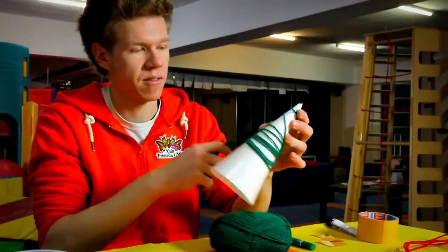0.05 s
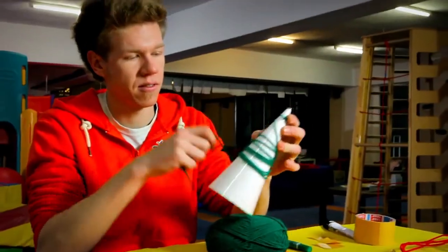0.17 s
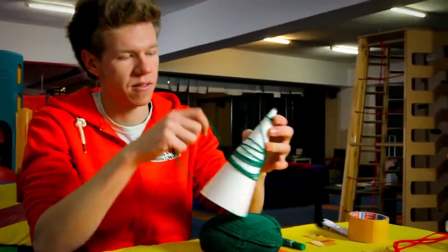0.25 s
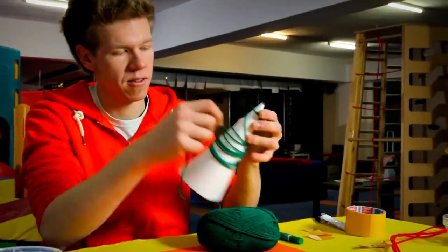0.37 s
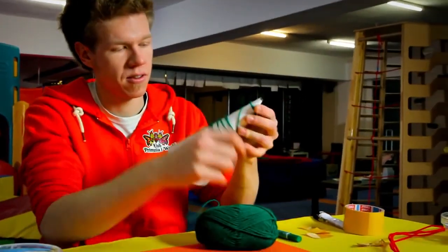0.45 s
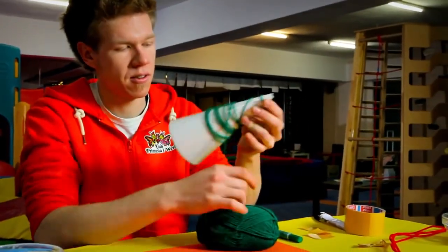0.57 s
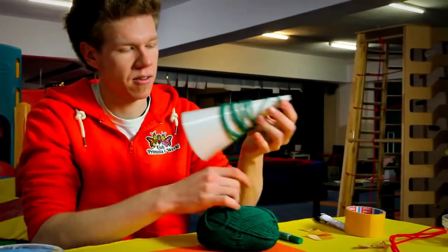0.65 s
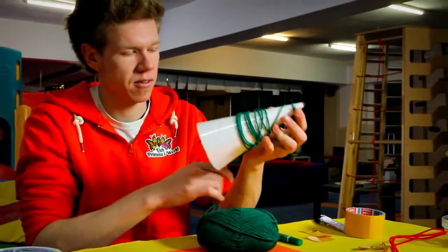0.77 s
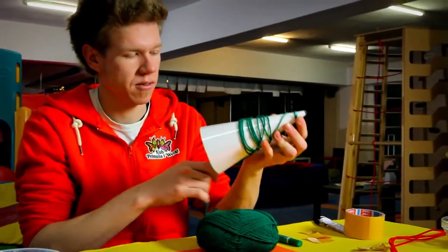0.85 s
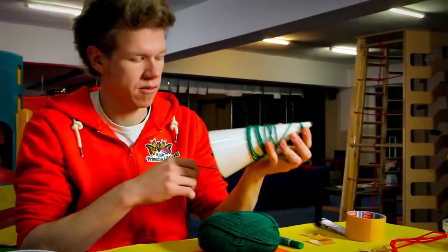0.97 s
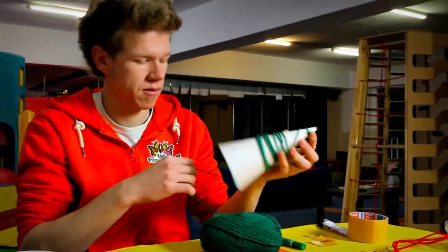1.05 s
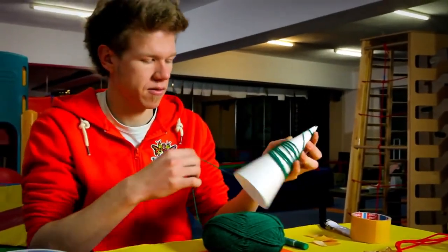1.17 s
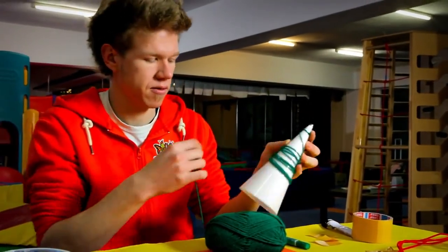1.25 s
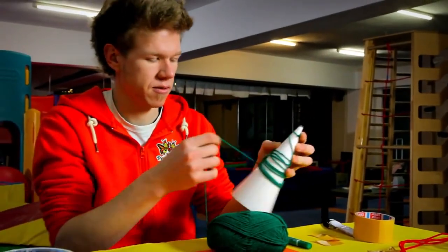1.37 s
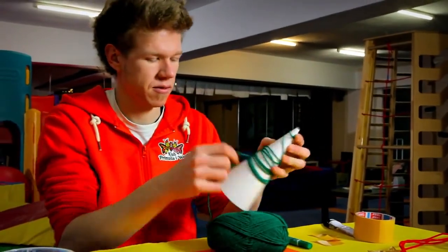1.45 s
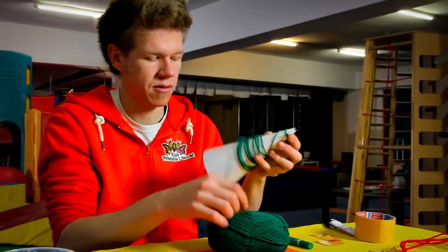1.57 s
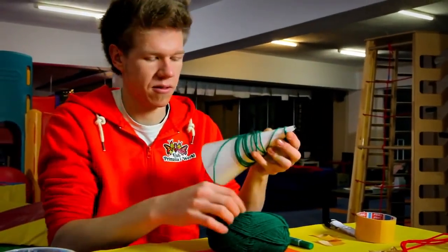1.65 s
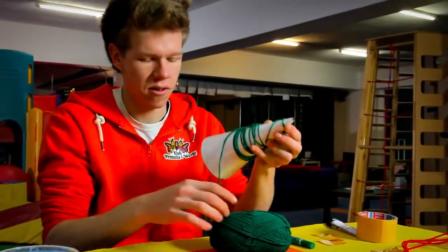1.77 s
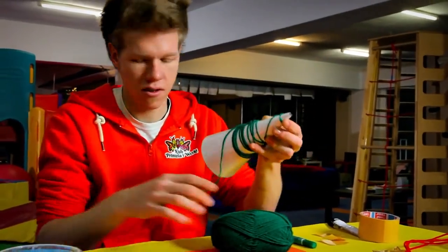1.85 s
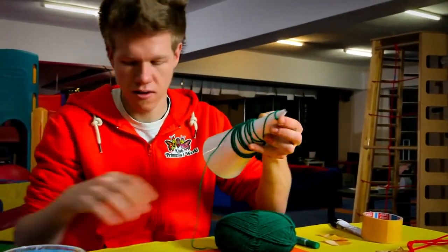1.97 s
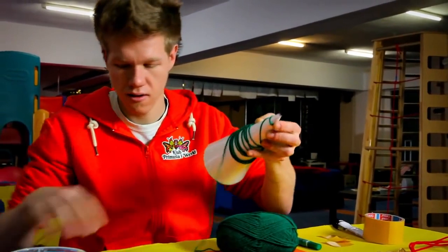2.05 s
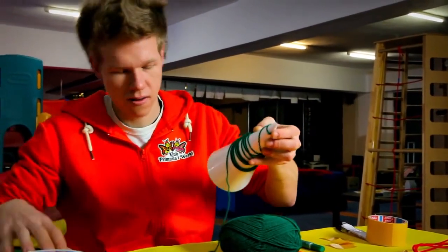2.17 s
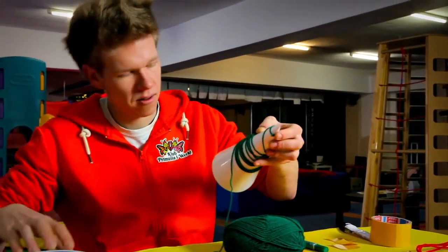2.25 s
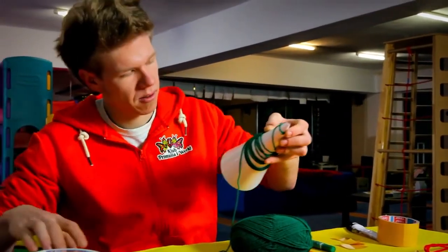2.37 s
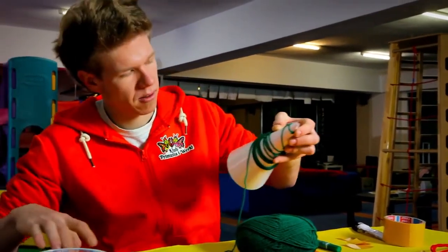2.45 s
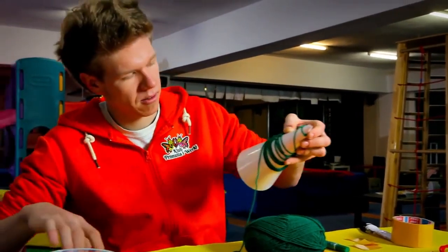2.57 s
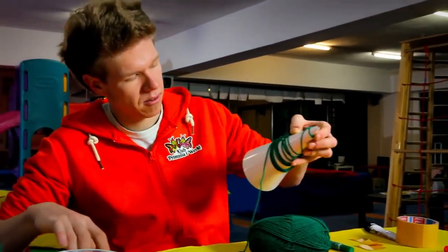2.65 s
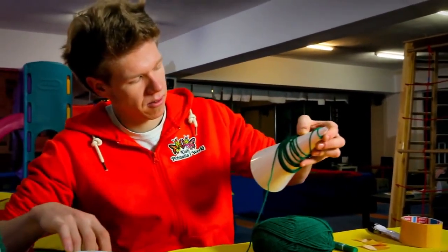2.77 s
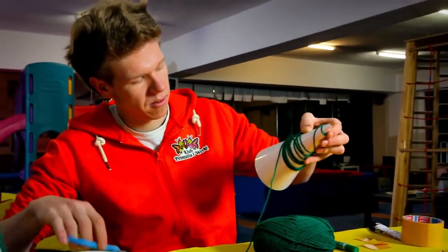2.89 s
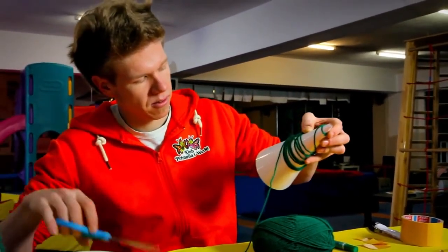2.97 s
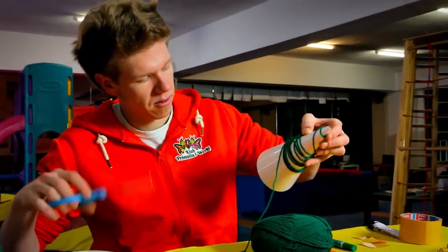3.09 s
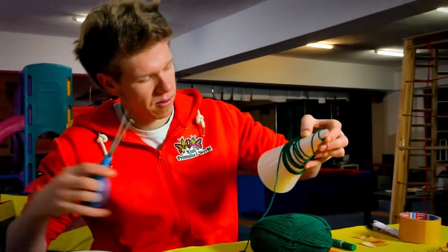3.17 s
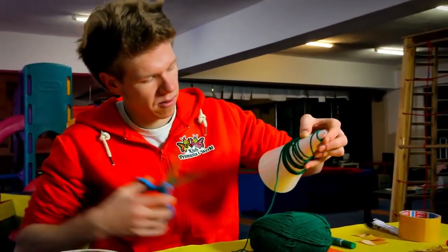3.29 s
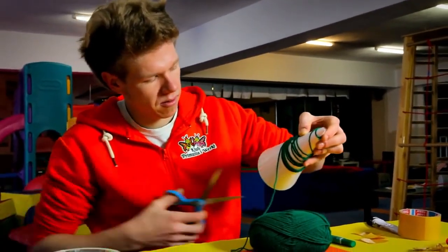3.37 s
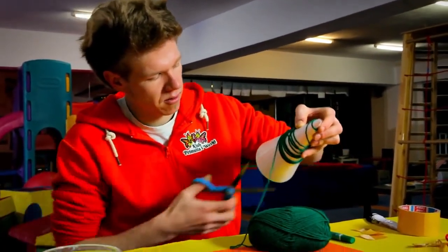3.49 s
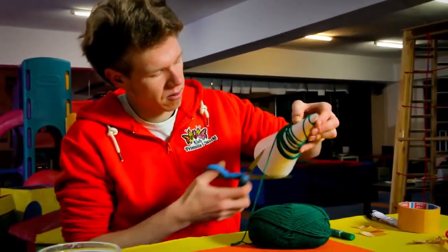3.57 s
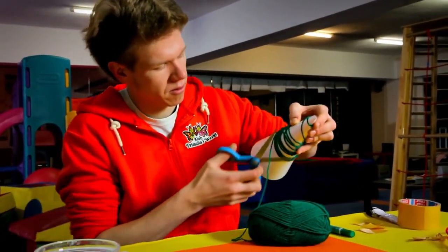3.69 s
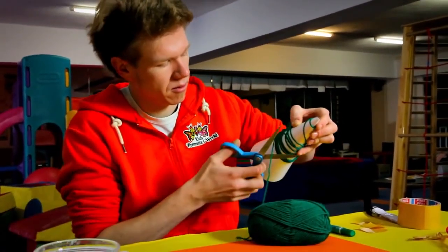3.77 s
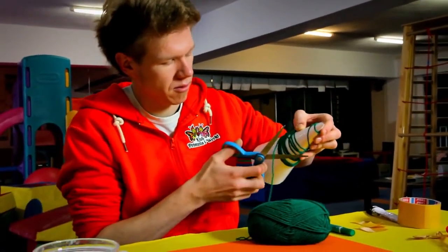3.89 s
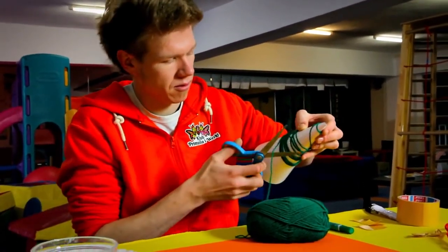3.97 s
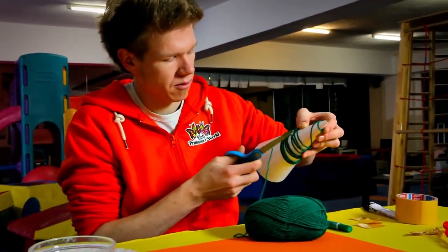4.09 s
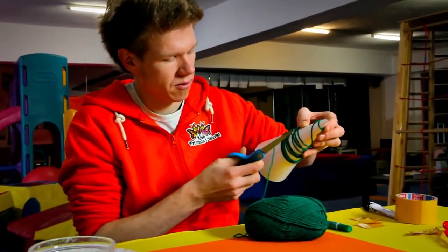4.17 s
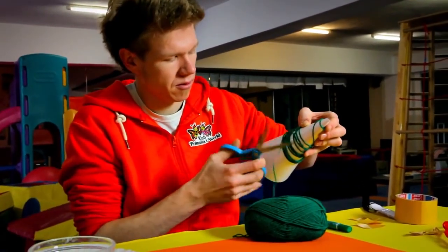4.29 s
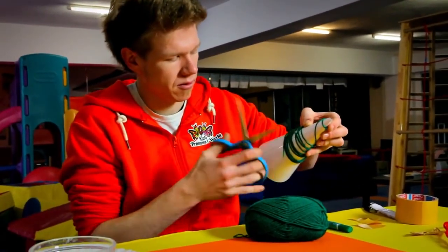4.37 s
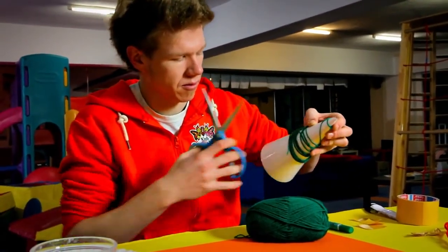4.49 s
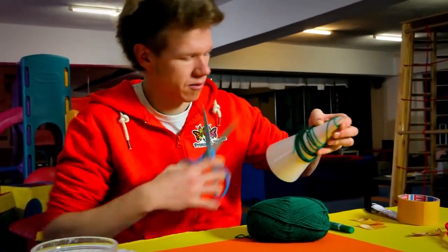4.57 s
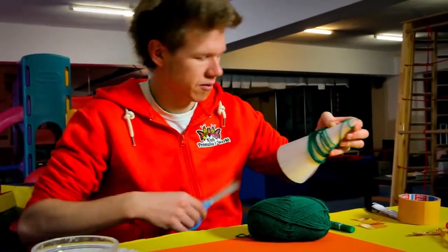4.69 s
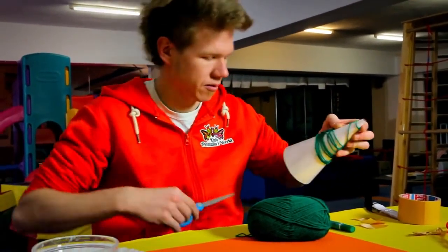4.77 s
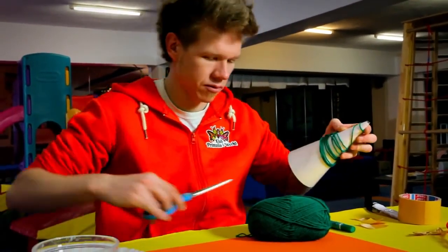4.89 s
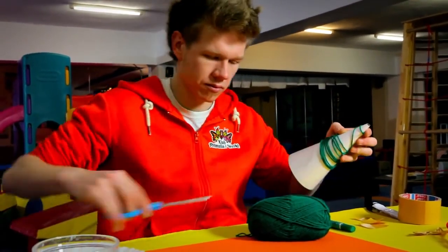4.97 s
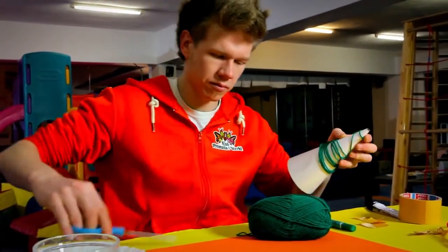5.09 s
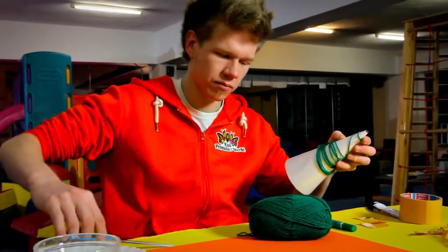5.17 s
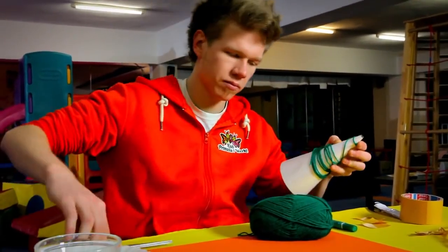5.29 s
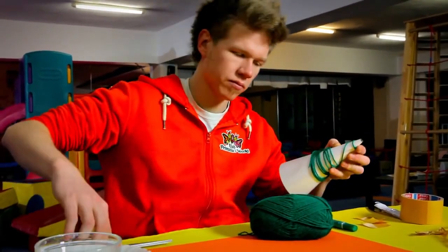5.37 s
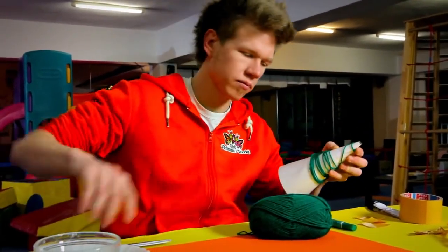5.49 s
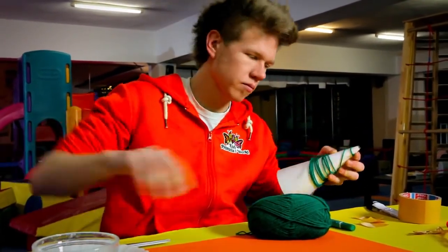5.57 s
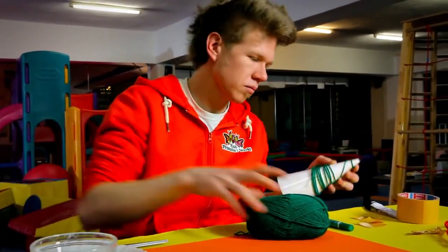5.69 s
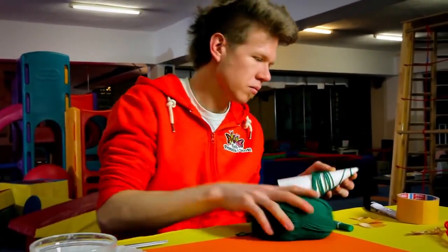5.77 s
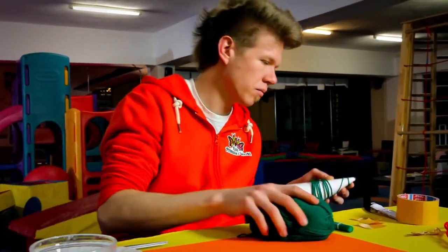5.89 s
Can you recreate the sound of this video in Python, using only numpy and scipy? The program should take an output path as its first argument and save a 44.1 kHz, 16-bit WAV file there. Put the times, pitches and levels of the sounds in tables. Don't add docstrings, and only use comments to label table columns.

```python
import sys
import numpy as np
from scipy import signal
from scipy.fft import rfft, irfft
from scipy.io import wavfile
from scipy.ndimage import uniform_filter1d

SR = 44100
rng = np.random.default_rng(int(sys.argv[2]) if len(sys.argv) > 2 else 0)


def linear_from_db(decibels):
    return 10 ** (np.asarray(decibels, float) / 20)


def transcribe(u):
    v = np.clip(np.atleast_2d(u).T, -1, 1)
    q = np.round(v * 32767).astype(np.int16)
    wavfile.write(sys.argv[1], SR, q)


N = 261865


def evened(x):
    return x / np.sqrt(np.mean(x ** 2) + 1e-20)


def read(points, hz):
    f, value = np.transpose(points)
    return np.interp(np.log(hz + 1), np.log(f + 1), value)


def add(mix, s, sound):
    part = mix[round(s * SR):][:len(sound)]
    part += sound[:len(part)]


def coloured(x, db_of_hz):
    gain = linear_from_db(db_of_hz(np.fft.rfftfreq(len(x), 1 / SR)))
    return evened(irfft(rfft(x) * gain, len(x)))


def causal(db_of_hz):
    log_gain = np.log(linear_from_db(db_of_hz(abs(np.fft.fftfreq(4096, 1 / SR)))))
    return np.fft.ifft(np.exp(np.conj(signal.hilbert(log_gain)))).real[:2048]


def strikes(rows, modes, centre_hz, favour_db, chatter_s, neutral_db):
    # frequency in Hz, level in dB.
    crack_spectrum = [(200, -15), (1200, 10.5), (2500, 9.5), (5000, -2.5), (7200, -11), (10000, -7.5),
                      (14000, -34)]
    out, t = np.zeros(N), np.arange(SR // 2) / SR
    hz, mode_db, t60 = np.transpose(modes)[:, :, None]
    sign = (-1.) ** np.arange(len(modes))[:, None]
    for s, db, ring, crack_db, best_hz in rows:
        hardness_db = 0.0892 * (db - neutral_db)

        def tilt(f):
            place_db = favour_db * np.exp(-(np.log2((f + 1) / best_hz) / 0.25) ** 2)
            return hardness_db * np.log2((f + 1) / centre_hz) + place_db

        decay = linear_from_db(mode_db + tilt(hz) - 60 * t / (t60 * ring))
        rings = decay * np.sin(2 * np.pi * hz * t) * sign
        chatter = 0.35 * rng.standard_normal(1024) * linear_from_db(-60 * t[:1024] / chatter_s)
        contact = signal.unit_impulse(1024) + chatter
        crack = np.convolve(contact, causal(lambda f: read(crack_spectrum, f) + tilt(f))[:512])
        add(out, s, linear_from_db(db) * rings.sum(0))
        add(out, s, linear_from_db(db + crack_db + 8) * crack)
    return out


def snips():
    # start in seconds, level in dB, gap between rebounds in seconds, most excited Hz.
    closings = [
        (4.136, -49, 0.013, 2900),
        (4.2744, -55, 0.0097, 8400),
    ]
    ring, crack_db, rebound_hz = 0.9, -9, 5670
    rows = []
    for s, db, gap, hz in closings:
        rows.append((s, db, ring, crack_db, hz))
        for k in (1, 2, 3):
            rows.append((s + k * gap, db - 15 - 2 * (k - 1), ring, crack_db, rebound_hz))
    return rows


def steel():
    # frequency in Hz, level in dB, T60 in seconds.
    steel_modes = [(1500, -23, .01), (2450, 0, 0.011), (3350, -2.5, 0.016), (4400, 2.5, 0.0057),
                   (5730, -1.5, 0.033), (6900, 1, 0.0043), (8400, 0.5, 0.0079), (10700, 12.5, 0.0069)]
    # start in seconds, level in dB, ring as a factor on T60, crack in dB re ring, most excited Hz.
    steel_blows = [(3.324, -61.5, .2, 2, 6400), (3.4205, -69, 0.083, 11.5, 4200),
                   (3.567, -62.5, 0.34, 4, 6900), (4.111, -62, .6, -5, 8000), (4.132, -60, 1, -3, 5000),
                   (4.295, -59, 1.1, 1.5, 2450), (4.405, -73, 1.5, -6, 2450), (4.761, -62, 0.82, 5, 7750),
                   (4.786, -59, 0.46, 5.5, 8500), (4.791, -70, 3.1, -1, 3350),
                   (5.292, -67.5, 0.28, 18, 9500)]
    return strikes(steel_blows + snips(), steel_modes, 6200, 12.6, 0.0045, -52)


def table():
    # frequency in Hz, level in dB, T60 in seconds.
    table_modes = [(140, -17.5, 1), (231, -7, 0.37), (374, -9, 0.71), (488, -11.5, 0.41), (570, -3.5, 0.17),
                   (632, -4.5, 0.17), (810, -13, 0.24), (989, -18.5, 0.27), (1074, 0.5, 0.089),
                   (1345, -34, 0.08), (1560, 0, 0.018), (1609, -7.5, 0.072), (1907, -5.5, 0.04),
                   (2380, 8.5, 0.0073), (2900, -0.5, 0.015)]
    # start in seconds, level in dB, ring as a factor on T60, crack in dB re ring, most excited Hz.
    table_blows = [(1.157, -65.5, 0.55, 3, 764), (2.264, -59.5, 0.68, -10, 545),
                   (2.275, -56, .98, -18, 493), (2.318, -49.5, 0.2, -7, 1500), (2.329, -54.5, 0.7, -1, 537),
                   (2.638, -59, 0.56, -17, 547), (2.652, -54, 0.47, -1, 1560),
                   (2.679, -54.5, 0.66, -12, 231), (3.325, -68.5, .98, -11, 836),
                   (5.1878, -40.5, 0.78, -6.5, 1660), (5.207, -52, 0.45, -14, 1080),
                   (5.3527, -39, 0.78, 7, 1030), (5.354, -36.5, 0.85, 7.5, 7330),
                   (5.3551, -33.5, 0.8, 1.5, 1520), (5.3566, -35, 0.42, 8.5, 13500),
                   (5.363, -40.5, 0.8, 1, 554), (5.372, -42.5, 0.61, 6.5, 1900),
                   (5.381, -54, 0.42, 14, 556)]
    return strikes(table_blows, table_modes, 570, 14.2, 0.019, -63.5)


def glass():
    # frequency in Hz, level in dB, T60 in seconds.
    glass_modes = [(1900, -24, 0.034), (2745, -4, 0.046), (3741, 1.5, 0.047), (4400, -4.5, 0.043),
                   (4890, -9, 0.081), (6160, -8.5, 0.095), (6310, -5.5, 0.038), (7510, -11.5, 0.18),
                   (9000, -28, 0.048)]
    # start in seconds, level in dB, ring as a factor on T60, crack in dB re ring, most excited Hz.
    glass_blows = [
        (2.208, -72, 0.28, -4, 3741),
        (2.2627, -46.5, 0.51, 6.5, 2900),
        (2.2745, -52, 0.83, -12, 5360),
        (2.3172, -50, 0.19, -20, 4890),
        (2.3225, -55, 0.77, 8.5, 4400),
        (2.626, -63, 1.1, -12, 6440),
        (2.641, -50, 0.78, 4.5, 5400),
        (2.669, -76, 0.66, -4, 2745),
        (2.676, -61, 1.4, 8.5, 1120),
    ]
    return strikes(glass_blows, glass_modes, 2940, 13.0, 0.013, -56)


def sing(rows):
    out, t = np.zeros(N), np.arange(2 * SR) / SR
    for s, hz, db, t60 in rows:
        onset = 1 - np.exp(-t * hz / 1.15)
        add(out, s, linear_from_db(db - 60 * t / t60) * np.sin(2 * np.pi * hz * t) * onset)
    return out


def mode_singing():
    # start in seconds, frequency in Hz, level in dB, T60 in seconds.
    single_modes = [(0, 790, -70, 0.81), (2.635, 1960, -50, 0.094), (2.638, 4890, -44.5, 0.1),
                    (2.675, 229, -61, 0.13), (3.566, 7360, -48.5, 0.0081), (4.139, 5720, -59, 0.17),
                    (4.788, 3420, -63, 0.035), (5.187, 540, -40, 0.36), (5.188, 599, -47, 0.61),
                    (5.1879, 1650, -21.5, 0.019), (5.188, 1106, -36.5, 0.067), (5.204, 1081, -46.5, 0.27),
                    (5.36, 231, -47, .25), (5.36, 388.4, -51, 0.81), (5.356, 562, -57.5, 2.05),
                    (5.356, 1317, -57, 1.3)]
    return sing(single_modes)


def dish_singing():
    # start in seconds, frequency in Hz, level in dB.
    dish_modes = [(2.28, 2710, -53), (2.2625, 1860, -68), (2.32, 1255, -62.5), (2.32, 1120, -67),
                  (2.668, 2745, -54), (2.672, 1161, -59), (2.673, 1879, -63), (2.669, 3741, -65),
                  (2.275, 4890, -59.5), (2.669, 9700, -70)]
    # frequency in Hz, T60 in seconds.
    dish_t60 = [(1160, 1.2), (1900, 0.96), (2750, 0.47), (7500, 0.085)]
    return sing([(*row, read(dish_t60, row[1])) for row in dish_modes])


def cone_taps():
    # start in seconds, frequency in Hz, level in dB.
    taps = [
        (.34, 674, -55.5),
        (1.135, 700, -53),
        (1.153, 746, -49.5),
        (3.429, 612, -46),
        (3.474, 650, -51.5),
    ]
    return sing([(*row, 0.039) for row in taps])


def rubs(rows, octaves):
    out = np.zeros(N)
    for s, length, db, hz in rows:
        u = np.arange(0, 1, 1 / (length * SR))
        catch, size, hiss = rng.random(SR), rng.exponential(1, SR), rng.standard_normal(SR)
        drive = hiss * (1 + 2.0 * (catch < .05) * linear_from_db(np.minimum(size, 2.5)))
        band = coloured(drive, lambda f: np.maximum(-6 * (np.log2((f + 1) / hz) / octaves) ** 2, -80))
        swell = np.sin(np.pi * u ** 0.5) ** 1.46
        add(out, s, linear_from_db(db - 1) * band[:len(u)] * swell)
    return out


def scrapes():
    # start in seconds, length in seconds, level in dB rms, centre in Hz.
    scrape_rows = [
        (2.199, 0.051, -74, 3500),
        (2.646, 0.053, -52.5, 1500),
        (2.667, 0.038, -54, 4660),
        (4.076, .064, -63, 5500),
        (4.122, .05, -51, 6600),
        (4.27, 0.05, -54, 6900),
        (4.752, 0.027, -59, 7500),
        (4.773, 0.038, -60, 5500),
    ]
    return rubs(scrape_rows, 1.7)


def drags():
    # start in seconds, length in seconds, level in dB rms, centre in Hz.
    drag_rows = [
        (2.22, 0.45, -62, 220),
        (2.677, .54, -69.5, 372),
        (5.2, 0.12, -60, 59),
        (5.38, 0.457, -69.5, 102),
        (5.62, 1, -72, 1210),
    ]
    return rubs(drag_rows, 0.92)


def narrow_rubs():
    # start in seconds, length in seconds, level in dB rms, centre in Hz.
    narrow_rows = [
        (1.067, 0.097, -68, 6700),
        (2.06, .06, -69.5, 140),
        (2.54, 0.14, -60.5, 140),
        (4.25, 0.27, -68.5, 140),
        (5.185, 0.12, -49, 145),
        (5.36, 0.31, -55, 135),
    ]
    return rubs(narrow_rows, 0.32)


def yarn():
    # start in seconds, length in seconds, level in dB rms, centre in Hz.
    yarn_rows = [
        (.288, 0.22, -72.5, 4050),
        (.6, 0.14, -70.5, 1900),
        (.765, 0.037, -58.5, 4440),
        (1.135, 0.064, -65.5, 5900),
        (2.91, 0.082, -68.5, 1500),
        (1.263, .044, -70, 5000),
        (3.307, 0.083, -72.5, 4500),
        (5.824, 0.16, -65.5, 5800),
        (5.895, 0.11, -66, 5740),
    ]
    return rubs(yarn_rows, 0.87)


def hall(x, turns_per_s):
    # frequency in Hz, T60 in seconds.
    hall_t60 = [(100, 0.95), (500, 0.82), (1500, 0.73), (3000, 0.54), (6000, 0.51), (12000, 0.41)]
    taps = np.zeros((3, 2, SR))
    slots = np.arange(160, SR - 20, 20)
    at = slots + rng.integers(0, 20, (3, 2, len(slots)))
    np.put_along_axis(taps, at, rng.choice([-1., 1.], at.shape), 2)
    hz, t, z = signal.stft(taps, SR, nperseg=256)
    early = 1 + 1.8 * np.exp(-t / 0.013)
    decay = linear_from_db(-60 * t / read(hall_t60, hz)[:, None])
    tail = signal.istft(z * early * decay, SR, nperseg=256)[1]
    tail[..., :160] = 0
    tail[:, 1] = 0.66 * tail[:, 0] + 0.42 * tail[:, 1]
    turn = np.pi * (turns_per_s * np.arange(N) / SR + np.arange(3)[:, None] / 3)
    fed = x * np.cos(turn) * np.sqrt(2 / 3)
    tail = tail / np.linalg.norm(tail[0, 0])
    return signal.fftconvolve(fed[:, None], tail, axes=2)[..., :N].sum(0)


def microphone(x):
    # frequency in Hz, gain in dB.
    response = [(20, -15), (90, 1.5), (200, 1.5), (8000, 3), (10000, -8), (11300, -14.5), (12200, -13),
                (14000, -22), (16000, -58)]
    return signal.oaconvolve(x, causal(lambda f: read(response, f))[None])[:, :N]


def air():
    # frequency in Hz, level in dB per Hz.
    air_spectrum = [(15, -10.5), (50, -6.5), (75, -26), (130, -11.5), (204, -11), (330, -14.5), (600, -17),
                    (861, -17.5), (1420, -20), (4660, -24), (7050, -27), (9500, -37), (11800, -44.5),
                    (12200, -60), (15000, -63)]
    # frequency in Hz, left-right likeness from 0 to 1.
    likeness = [(50, 1), (290, 0.62), (1380, 0.25), (6600, 0.14)]
    # frequency in Hz, level in dB rms.
    hum = [
        (48.4, -75),
        (215.3, -81),
        (882.9, -81.5),
    ]
    frames, hz = N // 256 + 5, np.fft.rfftfreq(1024, 1 / SR)
    a, b, c, d, patches = rng.standard_normal((frames, 513, 5)).T
    patches = uniform_filter1d(patches, size=12, axis=0)
    patches = evened(uniform_filter1d(patches, size=14, axis=1))
    same = np.clip(read(likeness, hz), -1, 1)[:, None]
    left = a + 1j * b
    right = same * left + np.sqrt(1 - same ** 2) * (c + 1j * d)
    z = np.array([left, right]) * linear_from_db(read(air_spectrum, hz)[:, None] + 0.14 * patches)
    out = linear_from_db(-63.5) * evened(signal.istft(z, nperseg=1024, noverlap=768)[1][:, :N])
    for f, db in hum:
        waver = evened(uniform_filter1d(rng.standard_normal(N), size=9000))
        phase = 2 * np.pi * np.cumsum(f + 1.933 * waver) / SR
        out += linear_from_db(db + 2.5 + 0.83 * waver) * np.sin(phase)
    return out * linear_from_db([[.3], [-.3]])


def scene():
    hands = steel() + scrapes() + drags() + narrow_rubs() + yarn()
    left = table() + glass()
    singing = mode_singing() + dish_singing() + cone_taps()
    direct = (left + singing) * linear_from_db([[1.9], [-1.9]]) + hands * linear_from_db([[.9], [-.9]])
    room = hall(left + hands, 330)
    return microphone(direct + linear_from_db(-6.0) * room) + air()


def top_cut(x):
    return signal.sosfilt(signal.butter(12, 15040, fs=SR, output="sos"), x)


def record(dry):
    offset = [-.0135, .0159]
    gate_db, gate_s, gate_depth = -74, 0.058, 0.82
    band_filter = signal.butter(4, [88, 172], "band", fs=SR, output="sos")
    band = signal.sosfiltfilt(band_filter, dry)
    level = np.sqrt(abs(uniform_filter1d((band ** 2).mean(0), size=round(gate_s * SR))))
    shut = uniform_filter1d(1. * (level < linear_from_db(gate_db)), size=700)
    gated = dry - gate_depth * band * shut
    return top_cut(gated + np.array(offset)[:, None])


dry = scene()
out = record(dry)
transcribe(out)
```